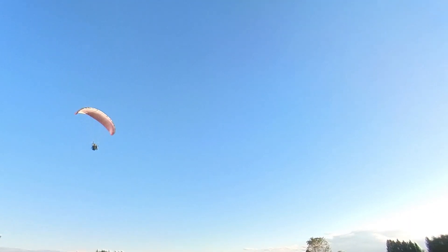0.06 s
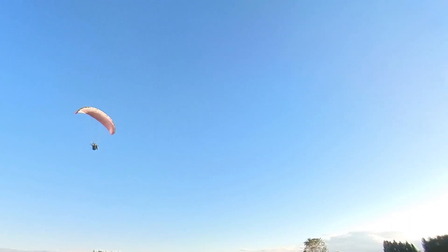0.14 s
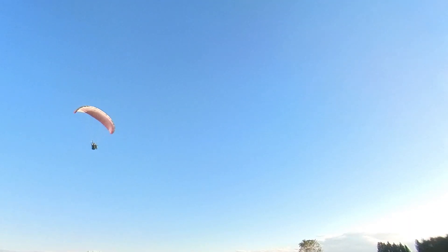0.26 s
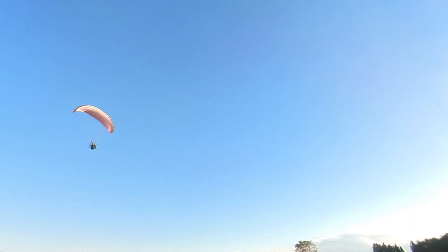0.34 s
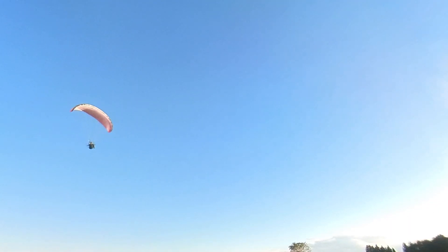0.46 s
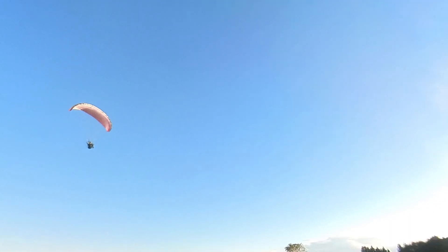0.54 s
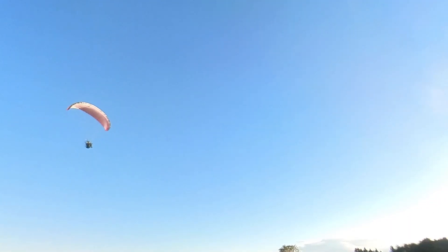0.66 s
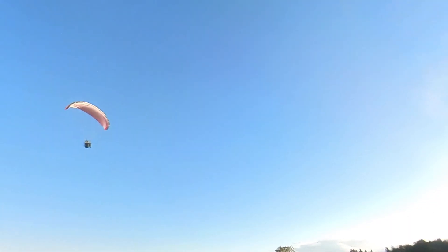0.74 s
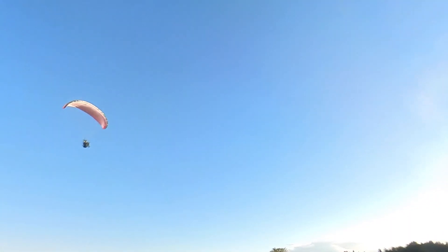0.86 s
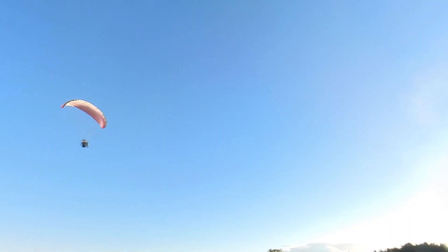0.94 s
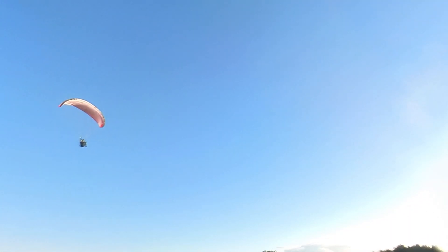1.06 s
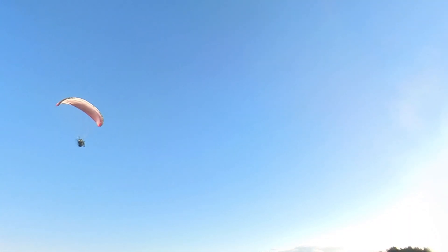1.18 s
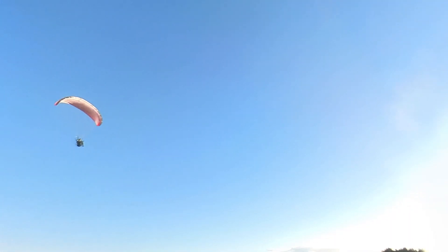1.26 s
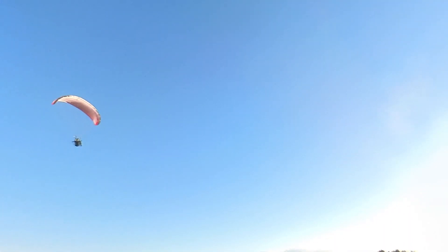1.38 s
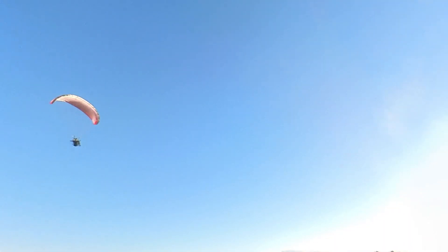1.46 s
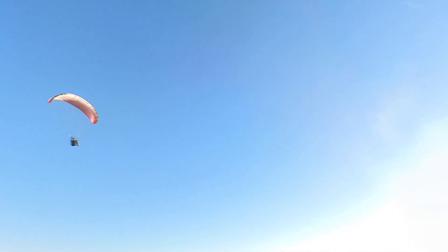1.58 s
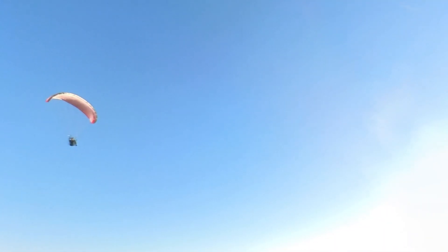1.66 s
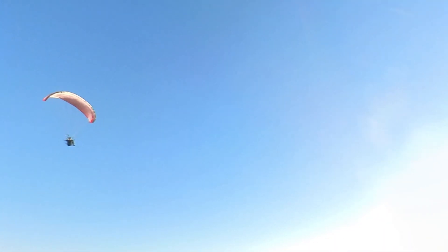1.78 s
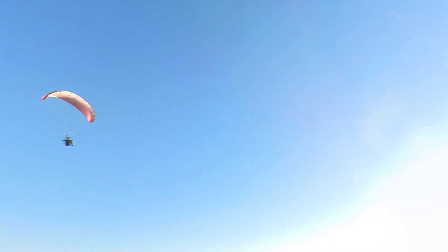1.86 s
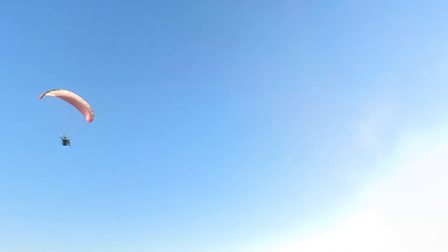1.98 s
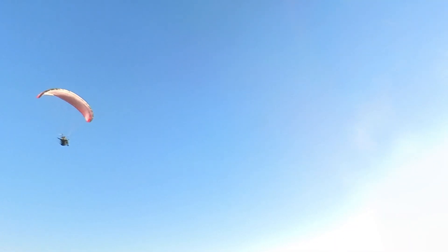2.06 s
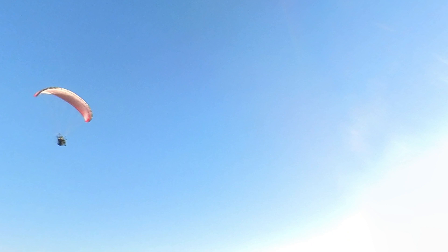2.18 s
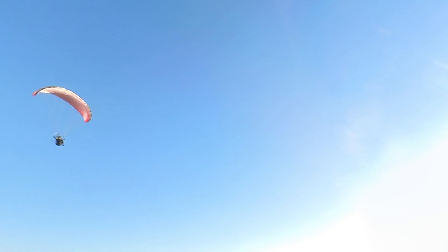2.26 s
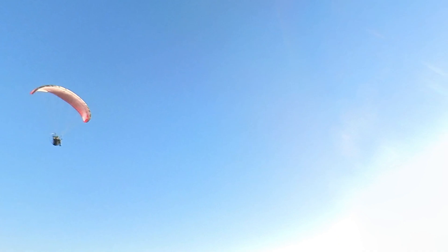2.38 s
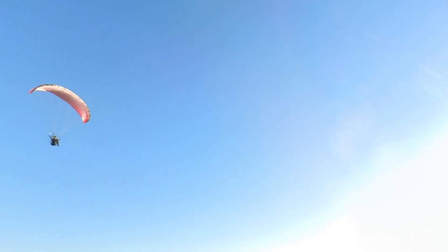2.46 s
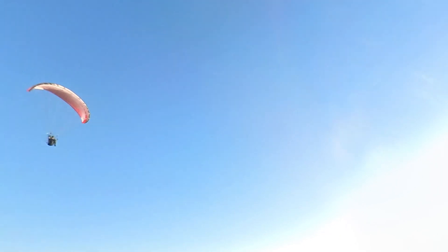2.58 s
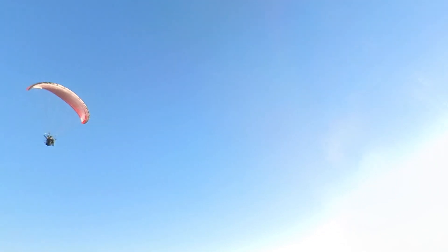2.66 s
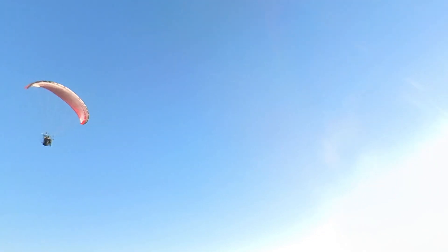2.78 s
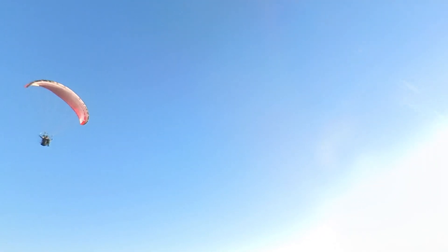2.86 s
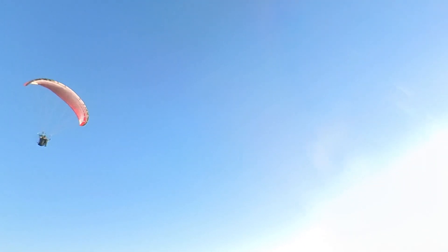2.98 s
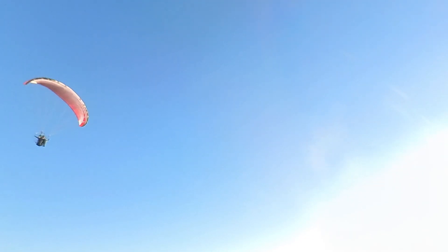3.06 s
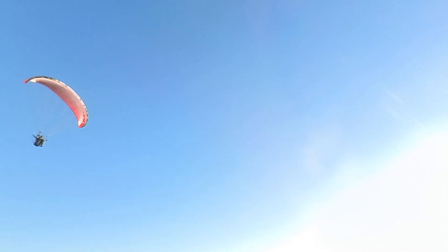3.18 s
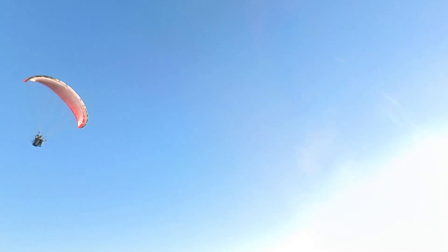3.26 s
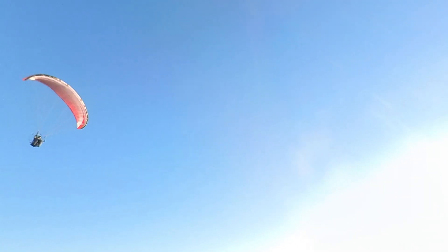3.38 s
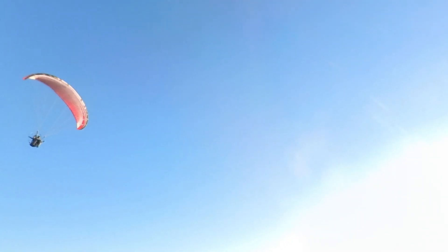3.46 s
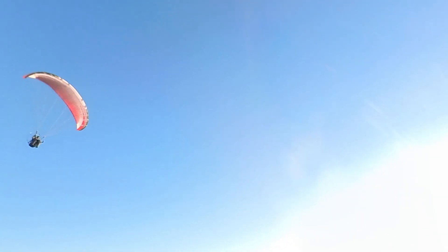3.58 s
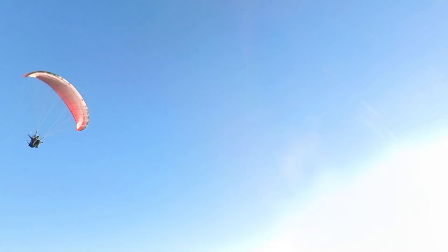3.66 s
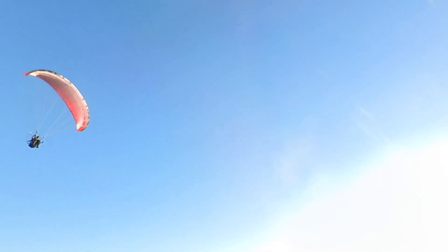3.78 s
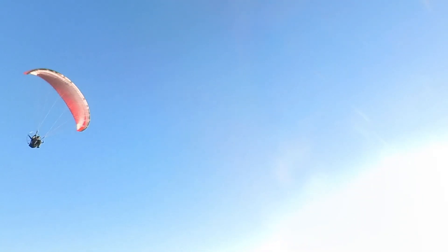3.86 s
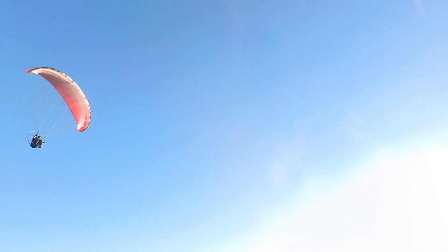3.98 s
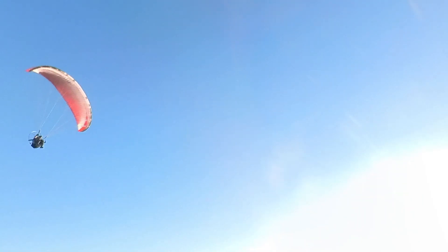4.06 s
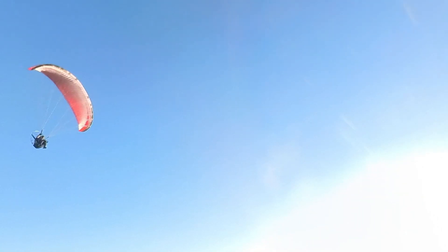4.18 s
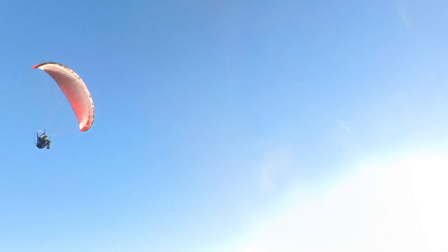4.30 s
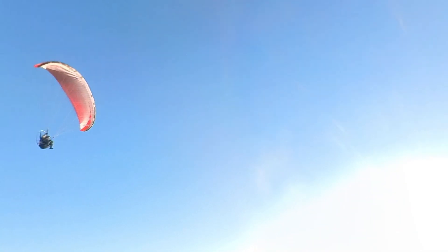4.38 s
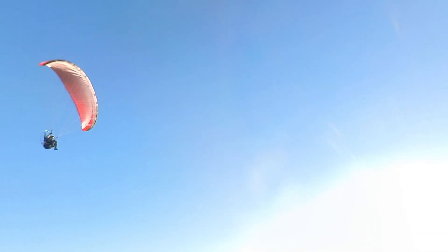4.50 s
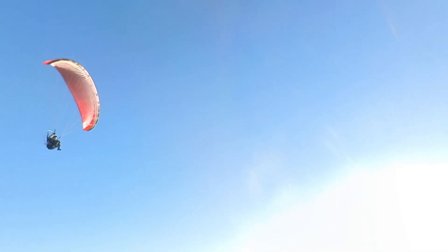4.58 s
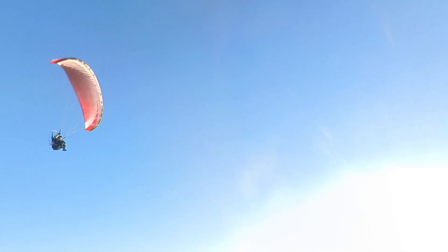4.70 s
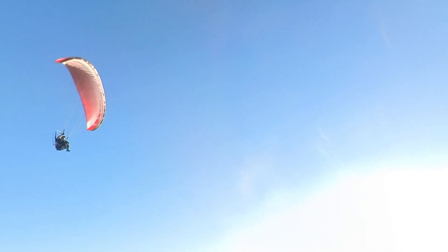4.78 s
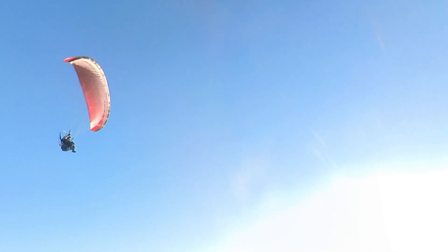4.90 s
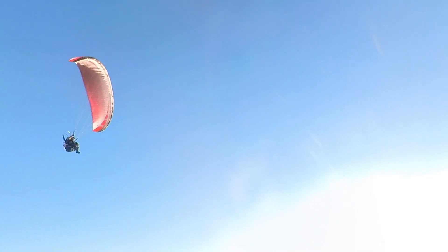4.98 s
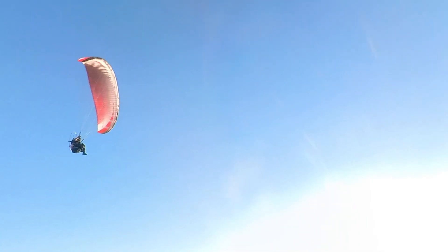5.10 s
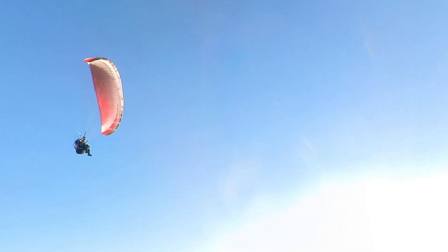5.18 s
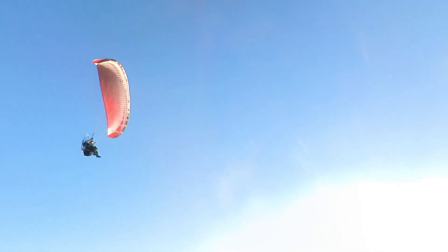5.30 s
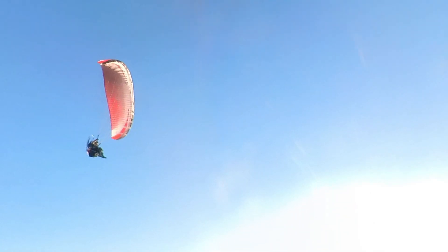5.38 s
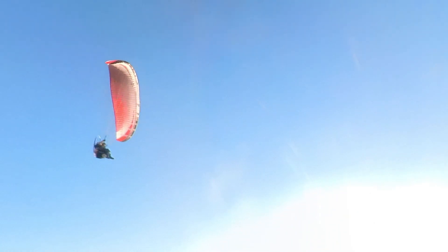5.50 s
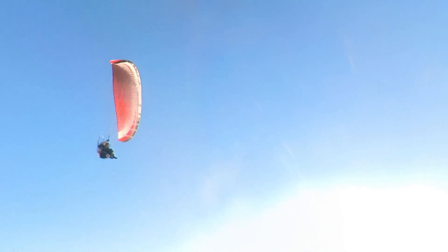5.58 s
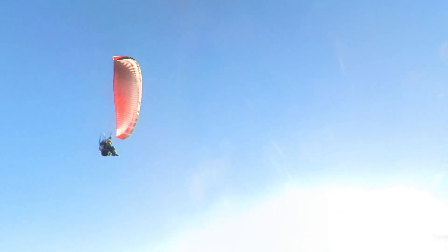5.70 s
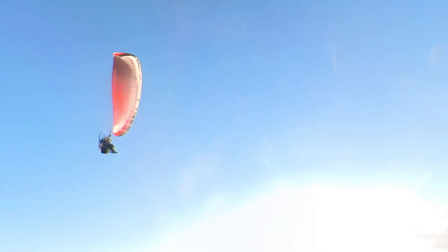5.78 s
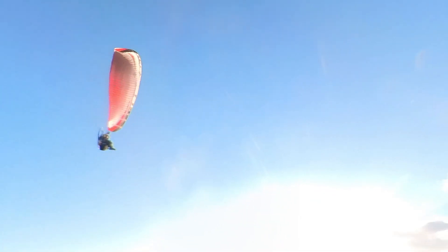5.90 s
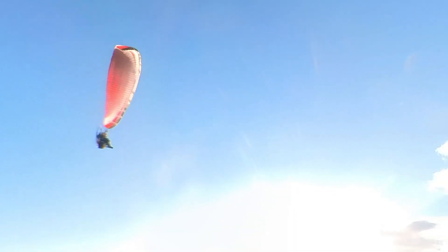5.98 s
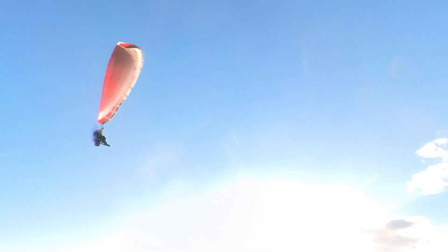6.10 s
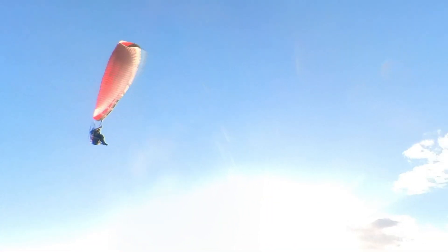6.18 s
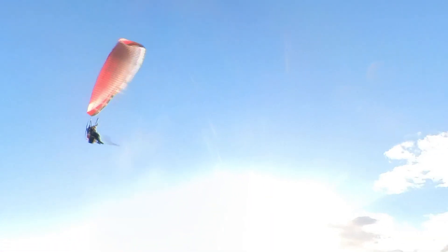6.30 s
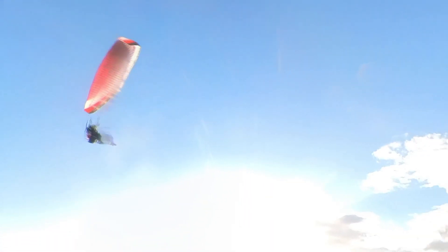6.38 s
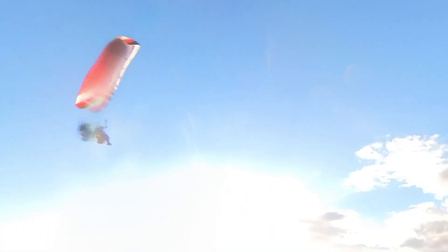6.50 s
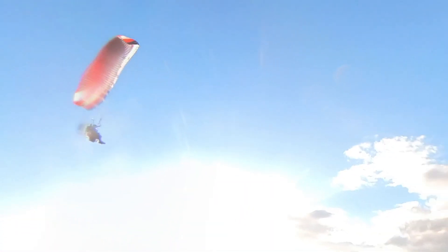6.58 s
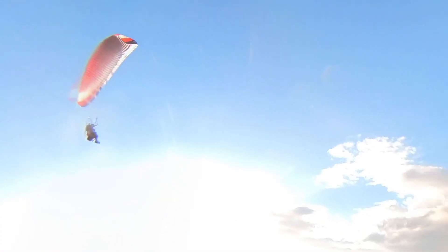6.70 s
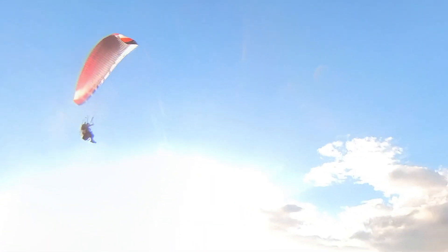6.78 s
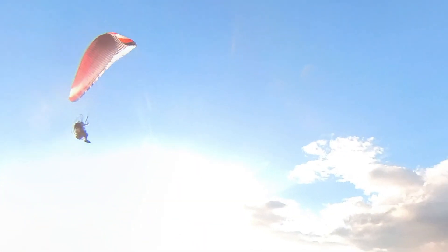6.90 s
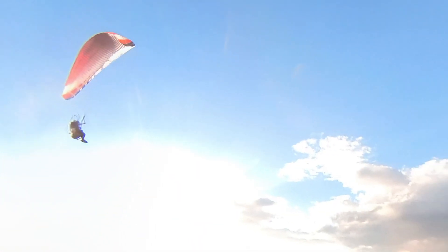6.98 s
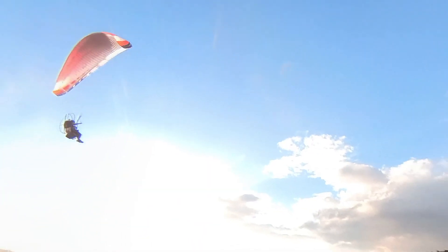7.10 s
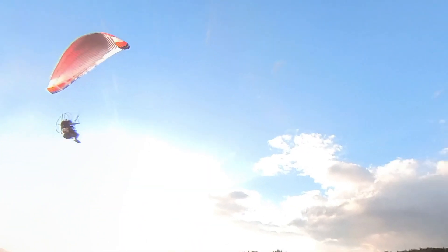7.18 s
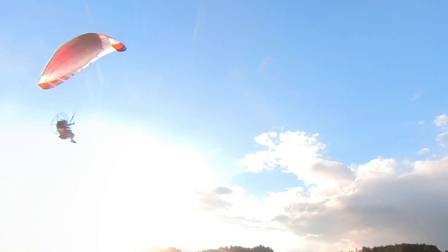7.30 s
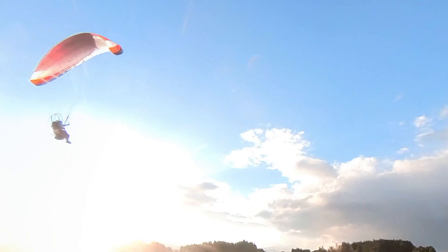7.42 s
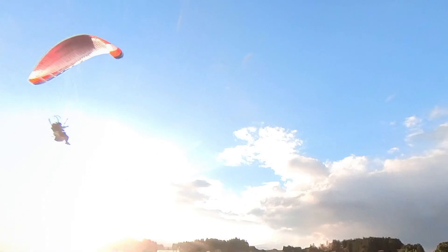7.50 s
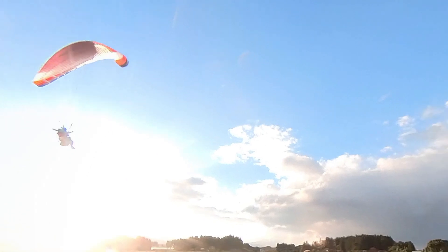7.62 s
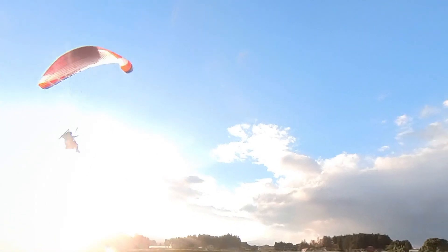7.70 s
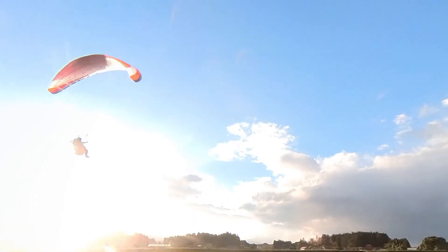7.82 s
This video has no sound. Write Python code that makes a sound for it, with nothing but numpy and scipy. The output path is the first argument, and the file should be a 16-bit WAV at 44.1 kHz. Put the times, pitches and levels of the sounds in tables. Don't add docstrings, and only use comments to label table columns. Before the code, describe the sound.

A powered paraglider with a small two-stroke engine at low throttle flies toward and over a handheld microphone in an open field. Irregular hollow bangs come about twenty a second, over crankcase hum and churning propeller wash, then slow and grow louder and sharper as it passes. Low wind thumps the microphone early and midway; faint housing clicks come late. Pitch sags slightly, and a thin belt whine and gas hiss emerge near the end.

```python
import sys
import numpy as np
from scipy import signal
from scipy.io import wavfile
from scipy.ndimage import uniform_filter1d, map_coordinates

SR = 44100
rng = np.random.default_rng(int(sys.argv[2]) if len(sys.argv) > 2 else 0)


def volts_from_db(level):
    exponent = np.asarray(level, float) / 20
    return 10 ** exponent


def to_wav(s):
    ch = np.atleast_2d(s).T
    pcm = np.round(np.clip(ch, -1, 1) * 32767)
    wavfile.write(sys.argv[1], SR, pcm.astype(np.int16))


N = 346185


def evened(x):
    return x / np.sqrt(np.mean(x ** 2) + 1e-20)


def curves(rows, t=None):
    t = np.arange(N) / SR if t is None else t
    s, *columns = np.transpose(rows)
    return [np.interp(t, s, column) for column in columns]


def spikes(s, size):
    at = np.clip(np.round(s * SR).astype(int), 0, N - 1)
    return np.bincount(at, size, N)


def slow(seconds):
    size = max(int(seconds * SR), 2)
    x = uniform_filter1d(rng.standard_normal(N), size)
    return evened(uniform_filter1d(x, size))


def noise(colour, tilt=((0, 0), (1, 0)), pivot_hz=1000, patchy_db=0., size=512):
    frames, hz = 4 * N // size + 5, np.fft.rfftfreq(size, 1 / SR)
    a, b, patches = rng.standard_normal((frames, len(hz), 3)).T
    patches = uniform_filter1d(patches, 6, 0)
    patches = evened(uniform_filter1d(patches, 10, 1))
    f, db = np.transpose(colour)
    colour_db = np.interp(np.log(hz + 1), np.log(f), db)[:, None]
    octaves = np.log2(1 + hz / pivot_hz)[:, None]
    tilt_db = octaves * curves(tilt, np.arange(frames) * size / 4 / SR)[0]
    z = (a + 1j * b) * volts_from_db(colour_db + tilt_db + patchy_db * patches)
    return signal.istft(z, nperseg=size, noverlap=3 * size // 4)[1][:N]


def resonate(x, hz, width_hz):
    turn = np.exp(2j * np.pi * np.cumsum(hz * np.ones(len(x))) / SR)
    r = np.exp(-np.pi * width_hz / SR)
    return 2 * (turn * signal.lfilter([1 - r], [1, -r], x / turn)).real


# t/s, level/dB
WIND = [(0, -52), (.8, -41.5), (1.5, -37.5), (1.95, -28), (2.25, -42.5), (3, -37), (3.55, -31), (3.9, -37),
        (4.15, -38), (4.5, -36), (5.2, -43.5), (5.7, -34), (6.1, -53.5), (7, -46), (7.85, -59)]
# f/Hz, density/(dB per Hz)
WIND_COLOUR = [(10, -35.5), (25, -23), (45, 3.5), (70, 2), (110, 0.5), (170, -3.5), (300, -15),
               (600, -64.5)]


def wind(lumpy_db=7.5):
    eddies = noise(WIND_COLOUR, pivot_hz=100, patchy_db=-1.0, size=2048)
    lumps_db = lumpy_db * np.clip(slow(0.01), -2, 1.5)
    return volts_from_db(curves(WIND)[0] - 1.5 + lumps_db) * evened(eddies)


# t/s, level/dB, f/Hz
GUSTS = [(.019, -24, 270), (.63, -22.5, 236), (.695, -22, 300), (.741, -23, 79.5), (.83, -22.5, 74.4),
         (1.24, -24, 87), (1.29, -27, 64), (1.38, -21, 95), (1.49, -18.5, 67), (1.771, -26, 79.5),
         (1.88, -28, 65), (1.949, -11.5, 108), (2.059, -20.5, 202), (2.1, -24, 93), (2.52, -22.5, 86.5),
         (3.26, -20, 100), (3.45, -16.5, 194), (3.46, -11.5, 114), (3.52, -27, 48.3), (3.609, -13, 105),
         (3.671, -22.5, 63.3), (3.82, -21.5, 78.5), (4.299, -21, 147), (4.369, -21.5, 75),
         (4.511, -21.5, 69), (4.66, -18.5, 107), (4.96, -19, 157)]
# t/s, level/dB, f/Hz
EDDIES = [(.03, -25, 95), (.155, -28, 75), (.31, -32, 65), (.44, -23, 85), (.6, -31, 60), (.67, -28.5, 170),
          (.82, -22, 150), (.92, -24, 75), (1.09, -27, 85), (1.13, -23.5, 150), (1.34, -22, 60),
          (1.42, -24, 150), (1.63, -29, 90), (1.77, -22.5, 160), (2.0, -17.5, 140), (2.06, -21, 60),
          (2.77, -33, 90), (2.86, -23, 160), (3.0, -31, 90), (3.59, -18, 65), (3.61, -24, 400),
          (3.81, -26, 160), (3.93, -24, 60), (4.22, -36, 60), (4.32, -26, 60), (4.54, -30, 160),
          (4.72, -22, 60), (4.74, -29.5, 150), (5.07, -24, 100), (5.36, -31, 110), (5.39, -36, 40),
          (5.66, -26, 90), (5.7, -23, 50), (6.03, -33, 70), (6.57, -34, 65), (6.77, -37, 60),
          (7.34, -25, 65)]


def gusts(cycles=0.93, skew=0.49, small_db=-36, small_hz=70):
    small = rng.random((30, 3)) * [N / SR, 6, .5] + [0, small_db - 3, -.2]
    rows = list(GUSTS) + list(EDDIES)
    rows += [(s, db, small_hz * 2 ** octave) for s, db, octave in small]
    chance = rng.uniform(-0.97, 1, (len(rows), 2))
    out = np.zeros(N + 8000)
    t = np.arange(-4000, 4000) / SR
    for (s, db, hz), (start, slide) in zip(rows, chance):
        u = t * hz / (cycles * (hz / 80) ** .5)
        turns_slid = hz * t * (1 + skew * slide * np.tanh(u / 2))
        thump = np.exp(-u ** 2 / 2) * np.cos(2 * np.pi * turns_slid + np.pi * start)
        out[round(s * SR):][:8000] += volts_from_db(db - 0.5) * thump
    return out[4000:N + 4000]


# t/s, level/dB
TICKS = [(5.022, -59), (5.236, -55.5), (5.305, -67), (5.3725, -51.5), (5.971, -59), (6.151, -61),
         (6.2901, -63), (6.941, -58), (6.959, -64), (7.161, -38.5), (7.2686, -58.5), (7.6725, -74)]


def ticks():
    s, db = np.transpose(TICKS)
    band = signal.butter(2, [7000, 12000], "band", fs=SR)
    return signal.lfilter(*band, spikes(s, volts_from_db(db + 18.0)))


# t/s, delay/ms
GROUND = [(0, 2.74), (.6, 2.84), (1.2, 2.97), (2, 3.15), (2.6, 3.18), (3.2, 3.21), (3.8, 3.25), (4.2, 3.34),
          (4.8, 3.6), (5.3, 3.92), (5.8, 3.955), (6.3, 3.9), (6.8, 3.69), (7.2, 3.46), (7.85, 2.9)]
# t/s, bass/dB, treble/dB
MIRROR = [(0, -8, -2), (.6, -3, 2.5), (2, -2, -6.5), (3.6, -1, -17), (4.6, -2, -19), (6.5, -1, -10),
          (7.85, -2.5, -6.5)]


def ground(x, dull_hz=1900, stir_ms=.025):
    late = (curves(GROUND)[0] + stir_ms * slow(0.076)) * SR / 1000
    echo = map_coordinates(x, [np.arange(N) - late], order=3)
    low_db, high_db = np.minimum(curves(MIRROR), 0)
    low = signal.lfilter(*signal.butter(1, dull_hz, fs=SR), echo)
    return x + volts_from_db(low_db) * low + volts_from_db(high_db) * (echo - low)


def scatter(wash):
    return volts_from_db(-6.0) * np.r_[wash[2600:0:-1], wash[:-2600]]


# t/s, f/Hz, level/dB
WHINE = [(0, 3630, -81), (4.5, 3617, -70), (6.3, 3540, -58), (7.1, 3490, -51), (7.85, 3450, -60)]


def belt():
    hz, db = curves(WHINE)
    wobbly_hz, rush_hz = hz * (1 + .004 * slow(.02)), hz * .86
    tone = resonate(rng.standard_normal(N), wobbly_hz, 150)
    tone = resonate(tone, wobbly_hz, 150)
    rush = resonate(rng.standard_normal(N), rush_hz, 1100)
    rush = resonate(rush, rush_hz, 1100)
    return volts_from_db(db + 1.5) * (evened(tone) + volts_from_db(-4.0) * evened(rush))


# f/Hz, density/(dB per Hz)
CHURN_COLOUR = [(35, -31.5), (70, -12), (150, 0.5), (250, -4), (400, -13), (650, -10.5), (900, -24.5),
                (1100, -22.5), (1400, -26), (2140, -36), (4000, -39), (6460, -48), (8840, -61.5),
                (11500, -81.5)]
# t/s, level/dB
PRESENCE = [(0, 8), (1.5, 2), (3.5, 2.5), (5, -4), (6.5, -1.5), (7.1, 0), (7.85, 4)]


def propeller(chop=0.45, gear=2.9, level_db=-28, follows_near=0.28):
    blades = np.cumsum(curves(SHAFT)[0] * 2 / gear) / SR
    s, outlet_db = np.transpose(OUTLET)
    tilt_db = 0.76 + 0.23 * (outlet_db + 43.0) + 0.37 * (curves(NEAR, s)[0] + 14)
    wash = noise(CHURN_COLOUR, np.transpose([s, tilt_db]), patchy_db=1.5)
    mid = signal.lfilter(*signal.butter(1, [1150, 1800], "band", fs=SR), wash)
    wash = wash + (volts_from_db(curves(PRESENCE)[0]) - 1) * mid
    near_db = uniform_filter1d(curves(NEAR)[0], SR // 2)
    level = volts_from_db(level_db + follows_near * near_db - 4.5)
    return level * evened(wash) * (1 + chop * np.cos(2 * np.pi * blades))


# t/s, level/dB
NEAR = [(0, -19), (.6, -18.5), (1.2, -18), (1.9, -19.5), (2.6, -17), (3.2, -17.5), (3.7, -16), (4.1, -17.5),
        (4.3, -12.5), (4.5, -13.5), (5, -12.5), (5.7, -9), (6.2, -9), (6.8, -10), (7.12, -7.5), (7.21, -10),
        (7.3, -6.5), (7.85, -13)]
# t/s, speed/(turns per s)
SHAFT = [(0, 81), (1.5, 82.5), (2.8, 82.4), (3.4, 81.2), (4.2, 80), (5, 78.4), (7.85, 77.5)]
# t/s, lead/dB, richness/dB; far off, steady, nearing, passing
RUNS = [(0.0113, 0, -3), (0.0485, 14, -4), (0.0986, -13, -7), (0.1232, -2, -5), (0.1478, 1, -5),
        (0.1971, 27, -12), (0.2338, 20, 0.5), (0.2832, 32, 3), (0.3204, 1.3, -5), (0.3572, 11, -6),
        (0.3948, 0, -2), (0.4564, 4, -9), (0.5059, -16, -4.5), (0.58, 16, -1.8), (0.6295, 11, 0),
        (0.6785, 4, -0.5), (0.739, 5, -2.5), (0.8122, 10, -0.5), (0.8616, 8, -3.5), (0.9227, 1, -3),
        (0.9843, 5, -1), (1.0334, 3, -3.5), (1.0824, 3, -2.5), (1.1315, 6, -2.5), (1.1805, 4, -2.5),
        (1.2291, 4, -2.5), (1.2778, 4, 0.5), (1.3268, -17, -2), (1.3753, 4, -0.5), (1.4238, -4, -0.5),
        (1.4722, 2, 1.7), (1.5207, -12, -2.0), (1.5691, 10, -0.5), (1.6297, 13, -1.5), (1.6532, 14, 0),
        (1.7014, -3, -0.3), (1.7495, -5, 1), (1.8093, 14, 3), (1.8575, 10, 4.5)]
STEADY = [(1.9059, -4, 0.5), (1.954, -1, 2), (2.002, 6, 3), (2.0627, 12, 3.5), (2.1107, 7, -0.5),
          (2.1591, -2.6, 0), (2.2074, 2, 2.5), (2.2554, 5, 0.5), (2.3038, -6, 1.5), (2.364, 2, -2),
          (2.4122, 7, 3), (2.4726, 13, 2.5), (2.5203, 1, -0.7), (2.5807, 9, 2.5), (2.6292, -12, -2),
          (2.6893, 7, 1.5), (2.7373, -11, 1.5), (2.7856, 1, 0), (2.8337, -1, -0.5), (2.882, 2, 2),
          (2.9425, 2, 0.5), (2.9902, 4, 1.5), (3.0506, 7, 3), (3.1105, 25, 0), (3.1585, 4.6, 0),
          (3.2192, 25.0, -2), (3.2555, 5, 0.5), (3.3164, 7, 3.5), (3.3778, 11, 3.5), (3.4275, -4, -1),
          (3.4896, 3.6, 0.5), (3.5514, 3.5, 1.5), (3.6132, 4, 2), (3.6748, 6, 2.5), (3.7364, 19, 6)]
NEARING = [(3.8105, 21, -0.5), (3.8473, -7, -1), (3.9088, 6, 1.1), (3.9704, 11, 4), (4.0452, 0, 1.5),
           (4.108, -5, 0), (4.1705, -10, 0.7), (4.233, 5, 3.5), (4.3082, 28, 2.5), (4.3595, -2.5, 0.5),
           (4.4226, -9, -1.5), (4.4984, 1, 1), (4.5739, 32, 2.5), (4.6251, 2.5, 2.3), (4.7025, -1, 1.4),
           (4.7785, 6, 4), (4.8676, 2, 1.9), (4.9437, 2, 4), (5.0207, 34, 6), (5.0738, -8, 1.3),
           (5.1522, 2, 0.3), (5.2286, 35, 3), (5.2934, -13, 1.4), (5.3571, -3.5, 0.1), (5.4202, 4, 1.5),
           (5.4962, 4, 1.1), (5.5722, -13, 0.5), (5.6493, -2, 0), (5.7253, 2, 1.5), (5.801, 0.5, 0.5)]
PASSING = [(5.8777, -1, 0.5), (5.9547, -11, 0.5), (6.0185, -12, 0), (6.0957, 18.5, 0.5), (6.1472, -4, 0.7),
           (6.2102, 7.5, 4), (6.2857, 7, 2.5), (6.349, 3, 1.1), (6.4258, 9, 2), (6.4896, 7.4, 3.5),
           (6.5532, -4, -1.5), (6.6164, 6, 3.5), (6.6927, 8.4, 4.5), (6.7702, 23, 2.5), (6.8231, 27, 1.2),
           (6.8751, 7.5, 3), (6.952, 13, 1.5), (7.0173, 2, 1), (7.0946, 19, -1), (7.1582, 17, -1),
           (7.2102, 0.6, -4), (7.2755, 4, -0.5), (7.3528, 2, -2.5), (7.4303, 1.5, -1), (7.5075, 30, -2),
           (7.5456, 0, -0.1), (7.6095, -2.5, -1), (7.6725, 4.5, 2.6), (7.749, 0.6, 0.5), (7.8118, 7, 3.5)]


def firings(single_db=19, sharing=1.71, wait_db=1):
    rows = list(RUNS) + list(STEADY) + list(NEARING) + list(PASSING)
    s, lead_db, rich_db = np.transpose(rows)
    rate = curves(SHAFT, s)[0]
    wait = np.maximum(np.diff(s, prepend=s[0] - .05), .01) * rate / 5
    charge_db = curves(NEAR, s)[0] + wait_db * np.log2(wait) + np.clip(rich_db, -6, 5)
    second_db = charge_db - 20 / sharing * np.log10(1 + volts_from_db(sharing * lead_db))
    pair = lead_db < single_db
    all_s = np.r_[s, (s + 1 / rate)[pair]]
    all_db = np.r_[second_db + lead_db, second_db[pair]]
    order = np.argsort(all_s)
    return all_s[order], all_db[order]


def turns():
    s = firings()[0]
    passed = np.round(np.diff(s) * curves(SHAFT, s[1:])[0])
    return s, np.r_[0, np.cumsum(np.maximum(passed, 1))]


def unfired_turns():
    s, count = turns()
    return np.interp(np.setdiff1d(np.arange(count[-1]), count), count, s)


# multiple of shaft speed, level/dB
ORDERS_DB = [(1, 3), (2, -14), (3, -9), (4, -12), (5, -7), (7, -17), (8, -11), (10, -26), (11, -8),
             (15, -22), (18, -23)]
# t/s, slope/(dB per octave)
FORWARD = [(0, 1.5), (.5, 1.5), (1, -.5), (1.8, -3), (4, -5), (7.85, -4)]
# t/s, level/dB
HUM = [(0, -37.5), (1, -38), (3.5, -39), (5, -40), (7.85, -40)]


def crankcase(waver_db=2.8, lag_rad=.23):
    s, count = turns()
    knots_s = np.r_[0, s, 9]
    knots = np.r_[-s[0] * 81, count, count[-1] + (9 - s[-1]) * 78]
    angle = 2 * np.pi * np.interp(np.arange(N) / SR, knots_s, knots)
    waver, forward_db = slow(0.033), curves(FORWARD)[0]
    tones = 0
    for k, db in ORDERS_DB:
        tone_db = db + forward_db * np.log2(max(k / 3, 1)) + waver_db * np.roll(waver, 9000 * int(k))
        tones = tones + volts_from_db(tone_db) * np.cos(k * (angle - lag_rad))
    return volts_from_db(curves(HUM)[0]) * tones


# t/s, level/dB
OUTLET = [(0, -46), (0.551, -46), (0.601, -41), (2.999, -40.5), (5, -38.5), (5.998, -40), (7.197, -35),
          (7.85, -31.5)]
# f/Hz, density/(dB per Hz)
HISS = [(500, -21.5), (1000, 12.5), (2000, -6.5), (3500, -1), (5000, -2.5), (6500, -6), (7500, -13),
        (9000, -10)]
# f/Hz, width/Hz, level/dB
SHELL = [(2670, 470, -13), (4440, 60, -11.5), (4910, 50, -6.5), (5390, 67, -2), (5660, 79, -9),
         (6250, 47, -8), (6360, 70, 1), (6700, 76, -1), (7160, 100, 1), (7600, 110, 1)]


def hiss(crack_ms=0.42, tail_ms=16, tail_db=-5, ring_db=6):
    s, bang_db = firings()
    db = curves(OUTLET, s)[0] + .75 * bang_db + 2 + .8 * rng.standard_normal(len(s))
    ms = np.arange(4000) / SR * 1000
    shape = np.exp(-ms / crack_ms) + volts_from_db(tail_db) * np.exp(-ms / tail_ms)
    power = signal.oaconvolve(spikes(s, volts_from_db(2 * db)), shape ** 2)[:N]
    gas = np.sqrt(abs(power)) * evened(noise(HISS, patchy_db=1.8, size=256))
    doppler = curves(WHINE)[0] / WHINE[0][1]
    rings = sum(volts_from_db(d + ring_db) * resonate(gas, f * doppler, w) for f, w, d in SHELL)
    return volts_from_db(8.5) * (gas + rings)


def port(track, puff_ms):
    u = np.arange(400) / SR / (puff_ms / 6000)
    puff = u ** 2 * np.exp(-u)
    return signal.lfilter(puff / puff.sum(), 1, track)


# f/Hz, width/Hz, level/dB, sign (push or pull)
SILENCER = [(640, 290, 4, 1), (255, 78, -2.8, 1), (86, 52, -8.5, -1), (400, 70, -19, 1), (778, 95, -11, 1),
            (462, 60, -18, 1), (895, 110, -14, 1), (1215, 150, -18, 1), (1470, 140, -24, 1),
            (2600, 600, -18, 1)]
# t/s, boom/dB, edge/(dB per octave), bark/dB
AIM = [(0, -6, -4, 2), (1.5, 4, 1.5, -1.5), (3, 6.5, 1, 1.5), (4.2, 2, 0, 10), (4.9, 3.5, -0.5, -4),
       (5.5, 10.5, 1.5, -6), (6.3, 1.5, 0, -5.5), (6.9, 5, 0, 2), (7.3, 6.5, -.5, 6), (7.85, 6.5, -1, 5)]


def silencer(s, db, spread, hard_db, back_ms=4.75, back_db=-13):
    chance = rng.standard_normal((len(s), 2 * len(SILENCER)))
    t, ring = np.arange(1300) / SR, 0
    doppler = curves(WHINE, s)[0][:, None] / 3560
    boom_db, _, bark_db = curves(AIM, s)
    for k, (hz, width_hz, mode_db, sign) in enumerate(SILENCER):
        pitch_hz = hz * doppler * (1 + spread * chance[:, [2 * k]])
        shot_db = db + mode_db + np.log2(hz / 500) * hard_db + 36 * spread * chance[:, 2 * k + 1]
        shot_db = shot_db + (hz < 120) * boom_db + (1100 < hz < 1600) * bark_db
        swing = np.exp(-np.pi * width_hz * t) * np.cos(2 * np.pi * pitch_hz * t)
        ring = ring + sign * volts_from_db(shot_db)[:, None] * swing
    at = np.round(s * SR).astype(int)[:, None] + np.arange(1300)
    track = np.bincount(at.ravel(), ring.ravel(), N)[:N]
    return track + volts_from_db(back_db) * np.roll(track, round(back_ms * SR / 1000))


# t/s, level/dB
GULP = [(0, -27), (.6, -26.5), (1.5, -41), (3.5, -49.5), (4.4, -35.5), (7.85, -30.5)]


def exhaust(sharpens=0.25):
    idle = unfired_turns()
    idle_db = curves(GULP, idle)[0] - 1.5 + 6.2 * rng.standard_normal(len(idle))
    s, db = firings()
    hard_db = sharpens * (db - curves(NEAR, s)[0] + 5.0) + curves(AIM, s)[1]
    fired = port(silencer(s, db, .02, hard_db), puff_ms=.9)
    gulps = silencer(idle, idle_db, .04, 0 * idle)
    gas = fired - port(gulps, puff_ms=1.52) + volts_from_db(-14.0) * port(gulps, puff_ms=0.42)
    return signal.lfilter(*signal.iirnotch(1040, 10., SR), gas)


def scene():
    wash = propeller()
    aircraft = exhaust() + crankcase() + hiss() + wash + belt()
    return (ground(aircraft) + scatter(wash) + wind() + gusts())[None]


def shaded(x, hz, width_hz, db):
    return x + (volts_from_db(db) - 1) * signal.lfilter(*signal.iirpeak(hz, hz / width_hz, SR), x)


# t/s, level/dB
SHADE = [(0, -5), (1.5, -8), (3, -1), (5, -3.5), (6, -3), (6.8, 4.5), (7.85, 3.5)]


def housing(x):
    x = shaded(x, 5690, 700, curves(SHADE)[0])
    return shaded(x, 8020, 910, -5.5)


def roll_off(x):
    return signal.sosfilt(signal.butter(12, 15800, fs=SR, output="sos"), x)


def record(dry, headroom=.95):
    housed = housing(headroom * np.tanh(dry / headroom))
    narrow = signal.sosfilt(signal.butter(18, 8300, fs=SR, output="sos"), housed)
    fizz = volts_from_db(-75 + 11 * np.minimum(slow(.015), 1.5)) * uniform_filter1d(abs(narrow), 300)
    strain = volts_from_db(-118) + fizz
    whistle = np.sin(2 * np.pi * 15734 * np.arange(N) / SR)
    whistle = volts_from_db(-97) * (slow(.015) > .8) * whistle
    heard = narrow + ticks() + whistle + strain * rng.standard_normal(N)
    heard = heard * np.minimum(np.arange(N, 0, -1) / 60, 1)
    return roll_off(heard)


dry = scene()
out = record(dry)
to_wav(out)
```